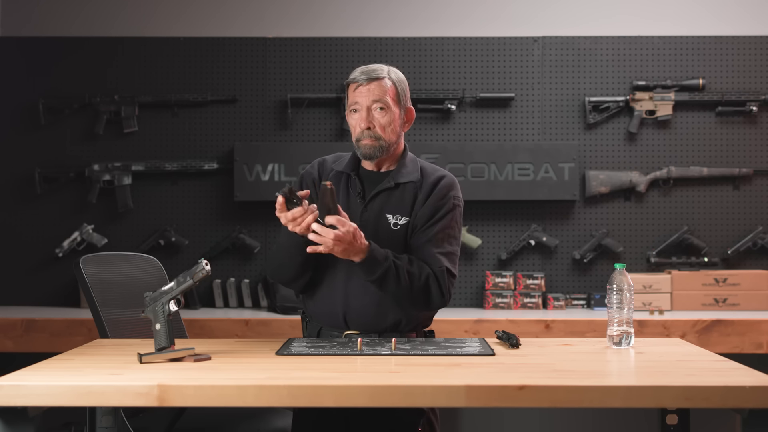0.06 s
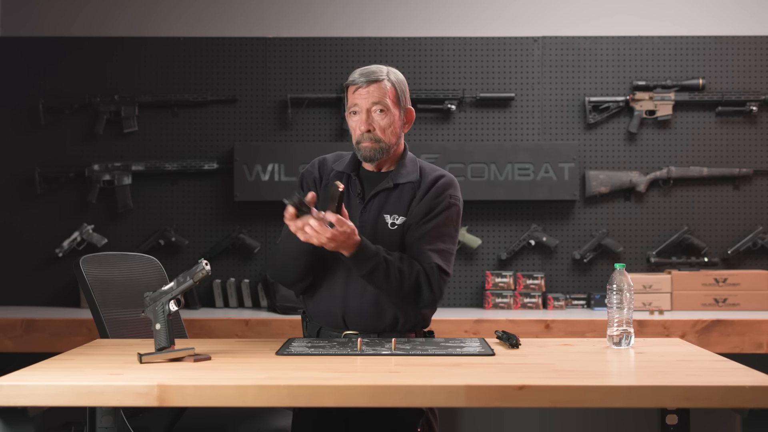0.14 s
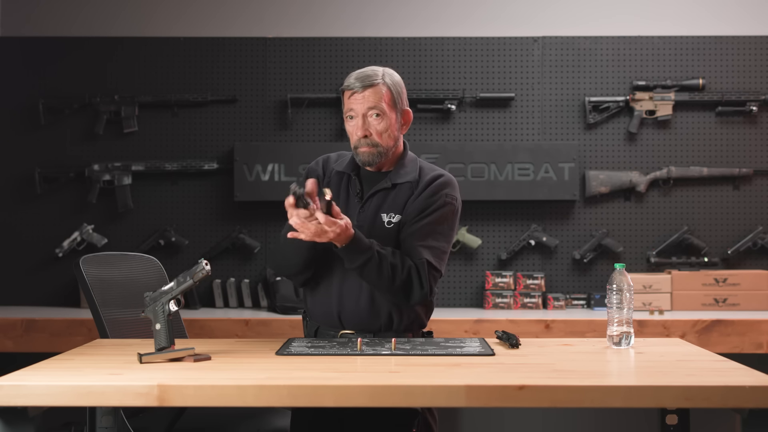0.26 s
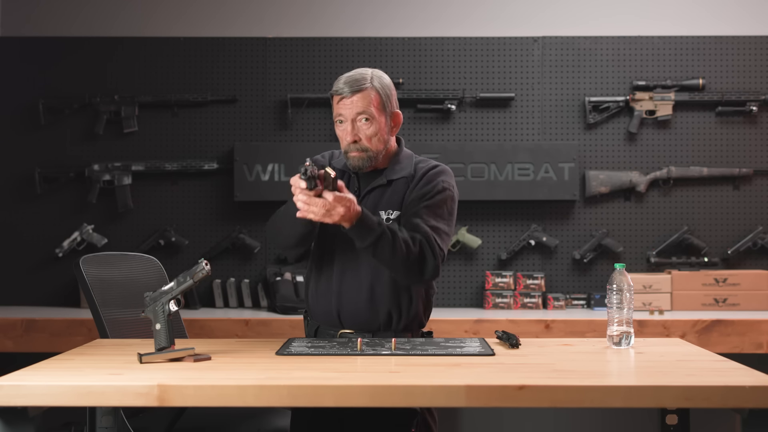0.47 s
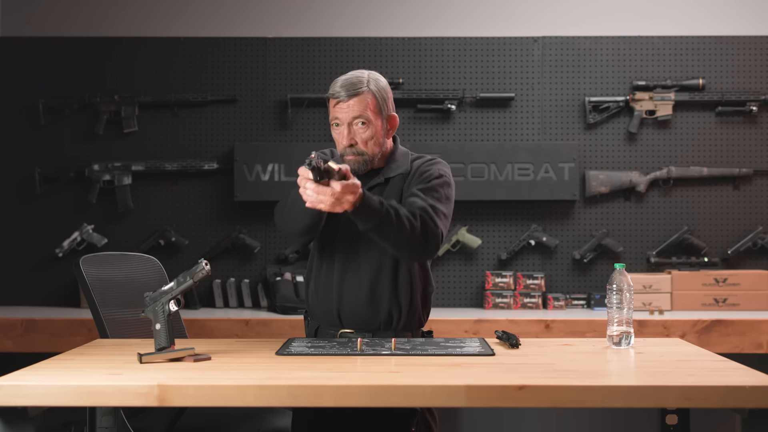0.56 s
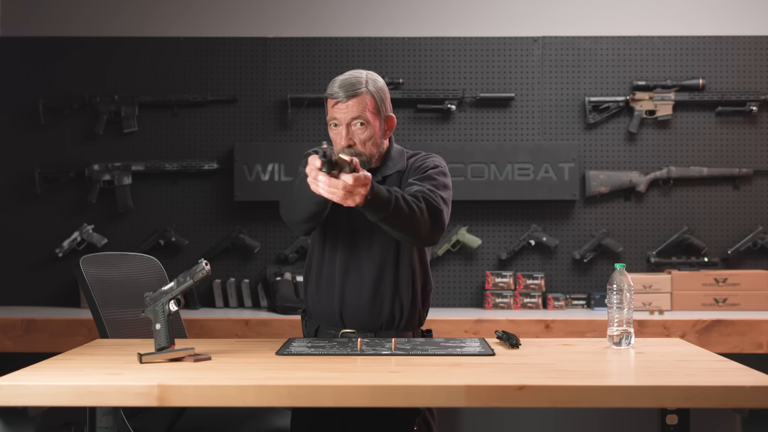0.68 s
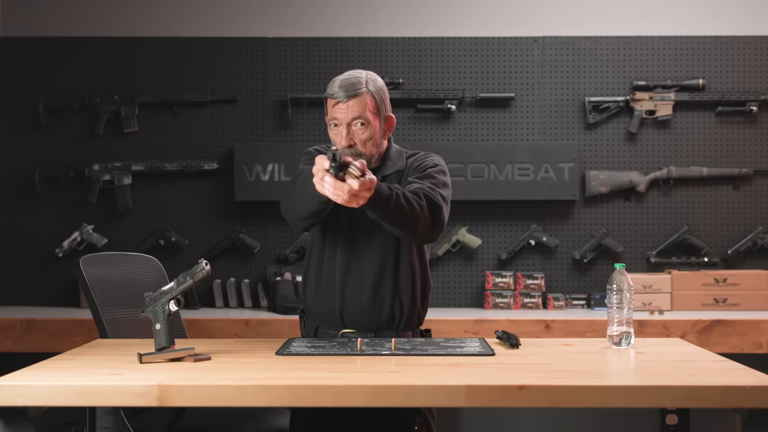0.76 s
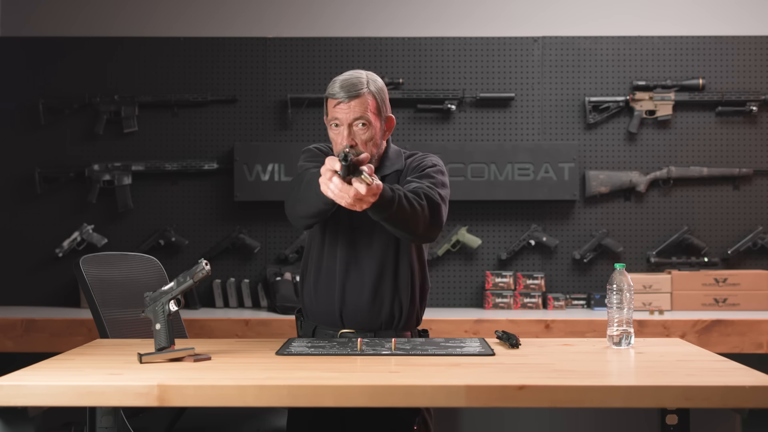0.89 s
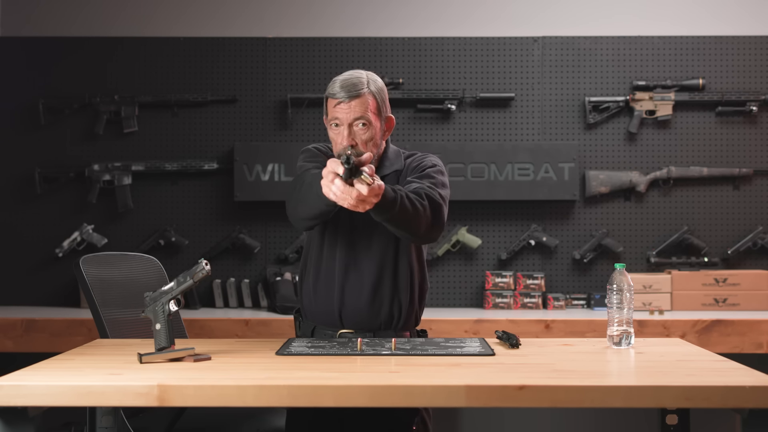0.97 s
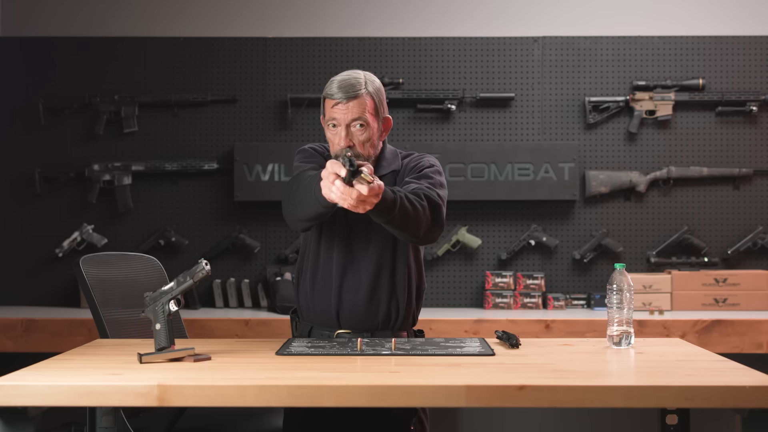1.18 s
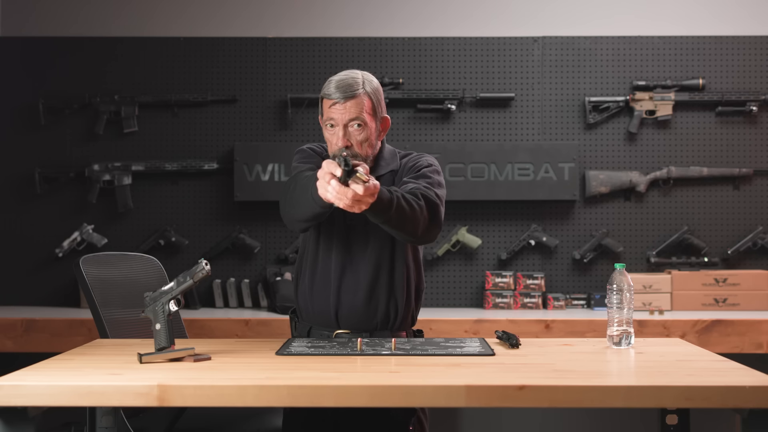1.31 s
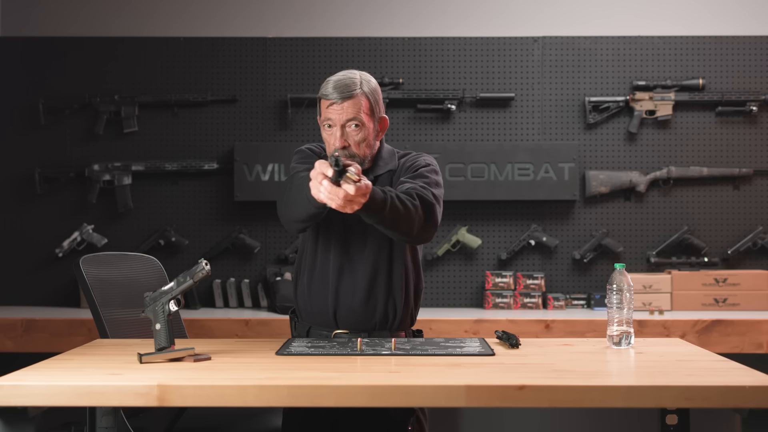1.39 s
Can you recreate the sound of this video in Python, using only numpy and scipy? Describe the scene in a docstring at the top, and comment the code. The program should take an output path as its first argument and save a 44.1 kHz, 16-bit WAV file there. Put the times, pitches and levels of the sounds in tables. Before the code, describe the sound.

Pistol reload up close: faint ticks, a sharp double metal clack, then soft handling knocks and cloth rustle

```python
"""Large, live room: a pistol is reloaded close to a clip-on microphone.
The magazine ticks and scrapes into the grip, clacks and is slapped home: noise bursts, decaying modes, puffs.
The hands knock softly on the grip (falling sines) and sleeves rustle as the arms push forward (shaped noise).
The room answers by convolution with a noise tail; quiet air and a midrange wash lie underneath."""
import sys
import numpy as np
from scipy import signal
from scipy.fft import rfft, irfft
from scipy.io import wavfile
from scipy.ndimage import uniform_filter1d

SR = 44100
rng = np.random.default_rng(int(sys.argv[2]) if len(sys.argv) > 2 else 0)


def wrap_up_sound(samples):
    """Save the sound to the file named by the first command line argument, as 16-bit audio."""
    columns = np.atleast_2d(samples).T
    # keep every value between -1 and 1, then stretch to whole-number steps
    tamed = np.clip(columns, -1, 1)
    steps = np.round(tamed * 32767).astype(np.int16)
    wavfile.write(sys.argv[1], SR, steps)


N = 63945
TIME_S = np.arange(N) / SR

# Quiet air, spectrum: f/Hz, level/dB
AIR_COLOUR = [(20, 14), (60, 8), (150, -6.5), (400, 0), (800, -3.5), (1600, -16), (4000, -24.5),
              (8000, -24.5), (16000, -28.5)]
AIR_DB = -59.5
# Soft midrange wash, level curve: t/s, level/dB
WASH_LEVEL = [(0, -52.5), (.1, -63), (.2, -52.5), (.5, -75.5)]
# Wash spectrum: f/Hz, level/dB
WASH_COLOUR = [(300, -22.5), (750, 5.5), (1000, -14), (1230, 12), (1500, -4), (1750, 3), (2300, 3),
               (4500, -6.5), (8000, -12.5), (16000, -11)]

# Room decay: f/Hz, t60/s
ROOM_T60 = [(100, .5), (400, 0.54), (850, 1), (2000, 0.78), (4500, 0.86), (6500, .7), (9000, 0.51),
            (15000, 0.26)]
# Room spectrum: f/Hz, level/dB
ROOM_COLOUR = [(60, -34), (250, -21), (500, -6.5), (700, -6.5), (860, 2.5), (1100, -0.5), (1450, -2.5),
               (2100, 4.5), (3000, 4), (4800, 1), (6000, 1.5), (8500, -3), (11000, -2.5), (15000, 5.5)]
ROOM_DB, ROOM_DELAY_S, ROOM_BUILD_S, CLOSE_TO_ROOM_DB = -11, 0.0054, 0.035, -9.5

# Rumble of the moving arms, level curve: t/s, level/dB
SWAY_LEVEL = [(0, -43), (.05, -44.5), (.15, -49.5), (.25, -34), (.35, -39.5), (.5, -56), (.63, -52.5),
              (.75, -60), (.88, -55), (1, -64), (1.45, -69)]
# Rumble spectrum: f/Hz, level/dB
RUMBLE_COLOUR = [(3, -14), (12, 7.5), (30, -12.5), (60, -22), (150, -48), (500, -90.5)]
# Sleeve rustle, level curve: t/s, level/dB
SLEEVE_LEVEL = [(0, -69), (.15, -58.5), (.3, -55), (.47, -53.5), (.53, -49), (.65, -48), (.73, -54),
                (.86, -52), (.92, -53), (.99, -64.5), (1.1, -78), (1.3, -70), (1.45, -64)]
# Cloth spectrum: f/Hz, level/dB
CLOTH_COLOUR = [(40, 8), (150, -1), (380, 1.5), (600, -9), (1500, -14.5), (2800, -23.5), (5000, -19.5),
                (8000, -25.5), (12500, -21), (16000, -20)]

# Dull knocks of the hands on the grip: t/s, level/dB, settled f/Hz, fade/s
KNOCKS = [(0.516, -42, 112.3, 0.016), (0.6311, -25, 394, 0.00076), (0.6432, -38.5, 199, 0.0034),
          (0.981, -48, 147, 0.0051), (1.12, -34, 231.5, 0.0035), (1.373, -48.5, 614, 0.0036)]
KNOCK_DROP_HZ, KNOCK_DROP_S, KNOCK_RISE_S = 1190, 0.00051, 0.00038
# Air pushed by the palm: t/s, pressure/dB, swell/s
PUSHES = [(0.139, -32, 0.0033), (0.206, -16.5, 0.0019), (0.2375, -10.5, 0.0011)]
MIC_BASS_HZ = 23.4

# Magazine sliding, level curve: t/s, level/dB
SLIDE_LEVEL = [(0, -70.5), (.045, -61.5), (.072, -46), (.105, -50), (.13, -63), (.17, -63), (.19, -42),
               (.204, -38), (.215, -81)]
# Slide spectrum: f/Hz, level/dB
SLIDE_COLOUR = [(300, -14.5), (1800, 2), (3000, -11), (6000, -9), (9000, 0), (12500, 5), (16000, -1)]
# Magazine modes as it seats: f/Hz, level/dB, t60/s
MAGAZINE_MODES = [(346.6, -13, 0.017), (735, 0, .012), (1407, -9.5, 0.015), (4240, -14, 0.017),
                  (9080, -33, 0.28), (9900, -43, .2), (10360, -10, .026), (11350, -11, 0.039),
                  (11500, -18, .025), (12200, -42, .16), (12800, -42, .17), (12935, -42, 0.18),
                  (14600, -47, .18)]
SEAT_S, SEAT_RISE_S = 0.2349, 0.00077

# Steel touching steel: t/s, level/dB, fade/s, low edge f/Hz, high edge f/Hz, body ring re level/dB
CONTACTS = [(0.0362, -38, 0.0025, 793, 3800, -7), (.0415, -40, .002, 700, 1670, -4),
            (0.112, -34.5, .0014, 1200, 13000, -9), (0.137, -43, 0.001, 896, 9060, -12),
            (0.1402, -23.5, .0016, 1490, 10800, -5), (0.147, -37, 0.0047, 700, 3950, -10),
            (0.2012, -12, 0.0018, 350, 16050, -9), (0.2035, -9, 0.0033, 300, 16000, -4),
            (.2062, -12.5, .0016, 350, 16000, -7), (0.2142, -25, 0.0013, 500, 12000, -4),
            (0.2178, -20.5, 0.0041, 898, 16120, -8), (.2346, -11, 0.0038, 900, 15700, -13),
            (0.2362, -9, 0.0045, 1401, 16400, -13.5), (0.2447, -19.5, .004, 906, 15870, -12.5),
            (.2470, -23.5, 0.0035, 899, 15860, -12.5), (0.6036, -34.5, 0.00097, 1100, 1880, 2.5),
            (0.6112, -36.5, 0.0019, 4000, 13900, -15), (.6450, -34.5, 0.0017, 702, 2790, -4.5),
            (.6830, -49, 0.0013, 2800, 4220, -2)]
# Contact crack spectrum: f/Hz, level/dB
CRACK_COLOUR = [(100, 0), (400, 7), (1100, -0.5), (2000, -1), (3000, -2.5), (5000, -1), (8000, -0.5),
                (10500, 5.5), (13500, 2.5), (16000, -2.5)]
CRACK_RISE_S = 0.00026
# Modes of the hand-damped pistol: f/Hz, level/dB, t60/s
BODY_MODES = [(420, -8, 0.027), (1512, -4.5, .02), (2710, -4, 0.014), (2864, -7.5, 0.024),
              (3550, -6.5, .02), (4170, -6, 0.022), (4960, -5.5, 0.03), (6220, -6, .018), (8020, -21, .018),
              (9430, -8.5, .02), (10107, -5, 0.027), (10300, -6, .018), (11830, -6.5, .02),
              (15350, -11, .02)]

BAND_LIMIT_HZ = 15850


def amp(db):
    """Decibels to gain."""
    return 10 ** (np.asarray(db) / 20)


def evened(x):
    """Scales to rms 1."""
    return x / np.sqrt(np.mean(x ** 2) + 1e-20)


def read(points, hz):
    """Interpolates a spectrum on a log-frequency axis."""
    point_hz, value = np.transpose(points)
    return np.interp(np.log(hz + 1), np.log(point_hz), value)


def level(points):
    """Level curve as gain over time, linear in dB."""
    return amp(np.interp(TIME_S, *np.transpose(points)))


def add(mix, start_s, sound):
    """Mixes a sound in at start_s, cut at the end of the mix."""
    part = mix[max(round(start_s * SR), 0):][:len(sound)]
    part += sound[:len(part)]


def edges(hz, low_hz, high_hz):
    """Gain between a soft low edge and a soft high edge."""
    low_gain = 1 / np.hypot(1, (low_hz / hz) ** 2)
    high_gain = 1 / np.hypot(1, (hz / high_hz) ** 2)
    return low_gain * high_gain


def shaped(x, colour, low_hz=0, high_hz=SR):
    """Keeps the phases of x, imposes a smooth spectrum between two soft edges; rms 1."""
    hz = np.fft.rfftfreq(len(x), 1 / SR) + 1
    gain = amp(read(colour, hz)) * edges(hz, low_hz, high_hz)
    phase = np.angle(rfft(x))
    return evened(irfft(gain * np.exp(1j * phase), len(x)))


def noise(colour):
    """Steady noise of rms 1 with a given spectrum."""
    return shaped(rng.standard_normal(N), colour)


def rubbing(curve, colour, grain_db, grain_s):
    """Friction: hiss whose level fluctuates in small clumps."""
    clumps = evened(uniform_filter1d(rng.standard_normal(N), max(int(grain_s * SR), 2)))
    hiss = noise(colour) * amp(grain_db * clumps)
    return level(curve) * evened(hiss)


def ring(modes, t, scatter_turns, low_hz=0, high_hz=SR):
    """Exponentially decaying modes within the edges of the blow, start phases random up to scatter."""
    out = np.zeros(len(t))
    for hz, db, t60_s in modes:
        decay = np.exp(-np.log(1000) * t / t60_s)
        swing = np.sin(2 * np.pi * (hz * t + scatter_turns * rng.random()))
        out += amp(db) * edges(hz, low_hz, high_hz) * decay * swing
    return out


def air_and_wash():
    """Steady quiet air under a midrange wash that dips, swells and fades."""
    return amp(AIR_DB) * noise(AIR_COLOUR) + level(WASH_LEVEL) * noise(WASH_COLOUR)


def room(x):
    """Diffuse tail: delayed, slow to build, decay rate set per frequency, highest treble lost first."""
    flat_noise = noise([(20, 0), (20000, 0)])
    hz, t, bins = signal.stft(flat_noise, SR, nperseg=256)
    decay = np.exp(-np.log(1000) * t / read(ROOM_T60, hz)[:, None])
    tail = signal.istft(bins * decay, SR, nperseg=256)[1][:N]
    tail = tail * (1 - np.exp(-np.maximum(TIME_S - ROOM_DELAY_S, 0) / ROOM_BUILD_S))
    tail = tail / np.linalg.norm(tail)
    colour = amp(ROOM_DB + read(ROOM_COLOUR, np.fft.rfftfreq(2 * N, 1 / SR)))
    return irfft(rfft(x, 2 * N) * rfft(tail, 2 * N) * colour)[:N]


def arms():
    """Sleeves rub as grainy hiss; the moving arms add low rumble."""
    rustle = rubbing(SLEEVE_LEVEL, CLOTH_COLOUR, grain_db=1.5, grain_s=0.0023)
    return rustle + level(SWAY_LEVEL) * noise(RUMBLE_COLOUR)


def knocks():
    """Hands on the grip: a few damped swings, quick at first and then slower."""
    out, t = np.zeros(N), TIME_S[:SR // 10]
    for start_s, db, settled_hz, fade_s in KNOCKS:
        hz = settled_hz + KNOCK_DROP_HZ * np.exp(-t / KNOCK_DROP_S)
        turns = np.cumsum(hz) / SR
        envelope = (1 - np.exp(-t / KNOCK_RISE_S)) * np.exp(-t / fade_s)
        add(out, start_s, amp(db) * envelope * np.sin(2 * np.pi * turns))
    return out


def pushes():
    """Each palm blow sends a puff of pressure into the microphone, high-passed at its bass limit."""
    out = np.zeros(N)
    for start_s, db, swell_s in PUSHES:
        u = TIME_S / swell_s
        add(out, start_s, amp(db) * u ** 2 * np.exp(-u) * 2)
    return signal.lfilter(*signal.butter(1, MIC_BASS_HZ, "high", fs=SR), out)


def slide():
    """The magazine scrapes into the grip: grainy friction hiss."""
    return rubbing(SLIDE_LEVEL, SLIDE_COLOUR, grain_db=3.5, grain_s=0.0015)


def seating():
    """The magazine hits its stop: its modes give a hollow clack and a thin, high ring."""
    out = np.zeros(N)
    onset = 1 - np.exp(-TIME_S / SEAT_RISE_S)
    add(out, SEAT_S, -onset * ring(MAGAZINE_MODES, TIME_S, scatter_turns=0))
    return out


def contacts():
    """Each touch is a brief crackle of steel that rings the pistol's body; returns both."""
    cracks, rings, t = np.zeros(N), np.zeros(N), TIME_S[:SR // 16]
    for start_s, db, fade_s, low_hz, high_hz, ring_db in CONTACTS:
        onset = amp(db) * (1 - np.exp(-t / CRACK_RISE_S))
        envelope = onset * np.exp(-t / fade_s)
        crack = shaped(envelope * rng.standard_normal(len(t)), CRACK_COLOUR, low_hz, high_hz)
        crack = crack * np.exp(-(t / fade_s / 10) ** 2)  # trims what shaping smears late
        crack *= np.linalg.norm(envelope) / np.linalg.norm(crack)  # energy of the envelope
        add(cracks, start_s, crack)
        body = ring(BODY_MODES, t, 1, low_hz, high_hz)
        add(rings, start_s, onset * amp(ring_db) * body)
    return cracks, rings


def scene():
    """Cracks and slide fill the room; rings, clack and knocks feed it less; the rest stays dry."""
    cracks, rings = contacts()
    bright = cracks + slide()
    close = rings + seating() + knocks()
    reverb = room(bright + amp(CLOSE_TO_ROOM_DB) * close)
    mix = bright + close + reverb + pushes() + arms() + air_and_wash()
    return mix[None]


def record(dry):
    """Rounds off peaks near full scale, then limits the band."""
    held = dry / (1 + dry ** 4) ** (1 / 4)
    lowpass = signal.firwin(511, BAND_LIMIT_HZ, window=("kaiser", 9), fs=SR)
    return signal.oaconvolve(held, lowpass[None], "same")


dry = scene()
out = record(dry)
wrap_up_sound(out)
```